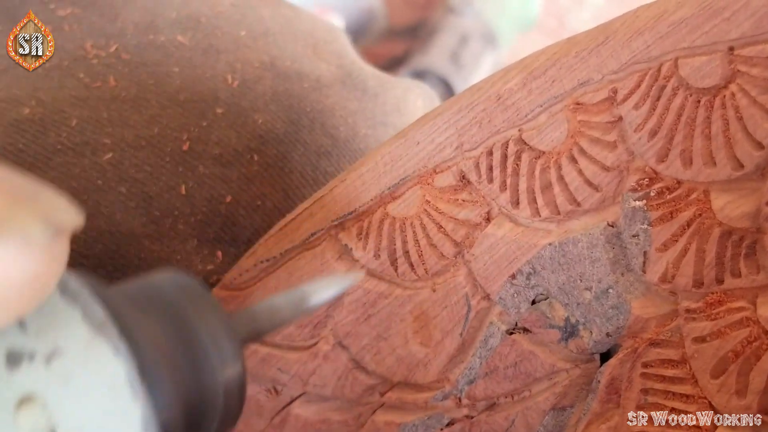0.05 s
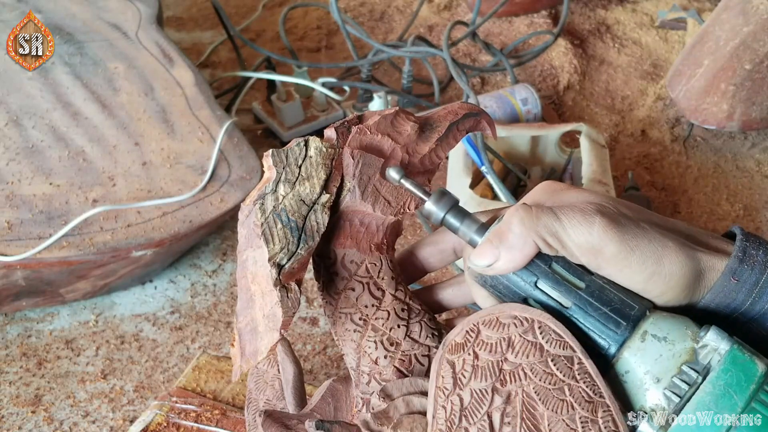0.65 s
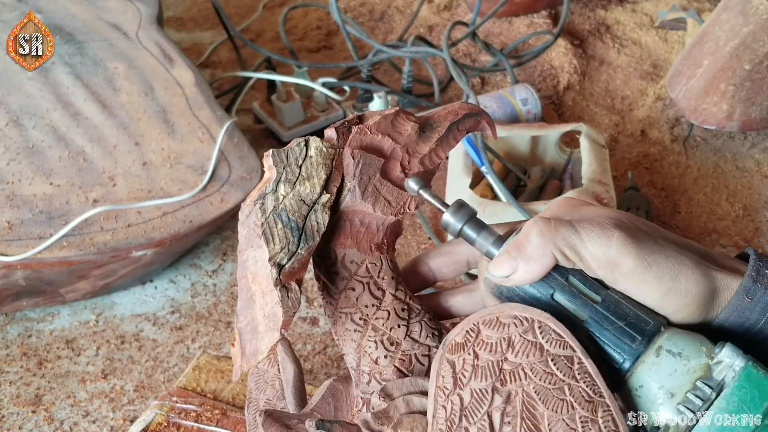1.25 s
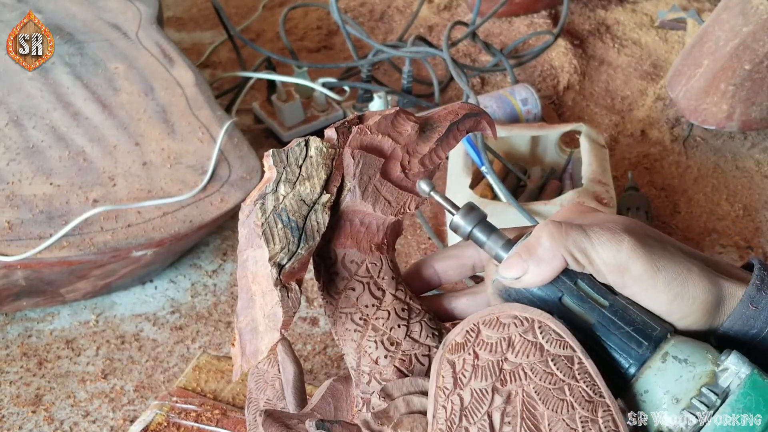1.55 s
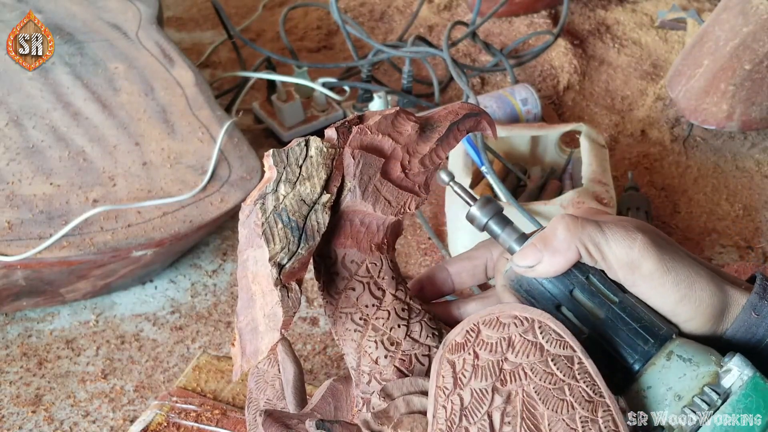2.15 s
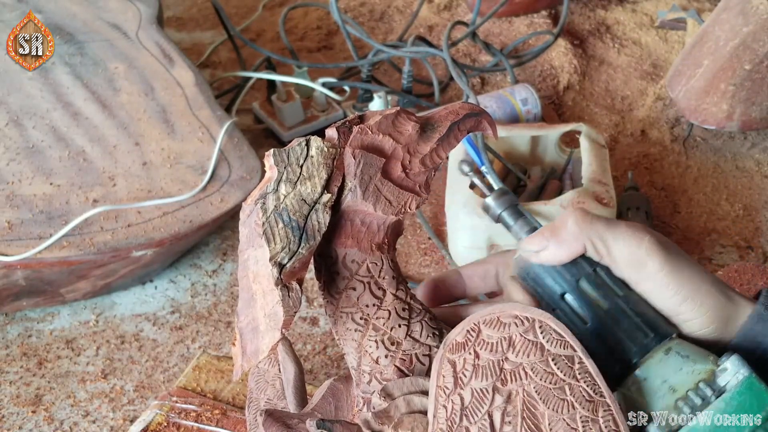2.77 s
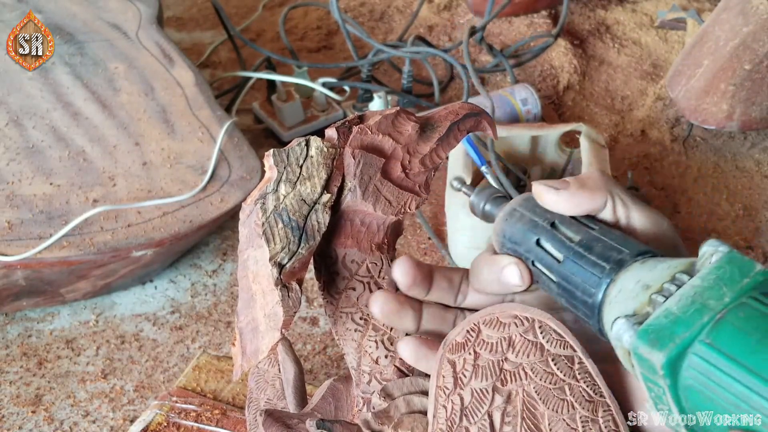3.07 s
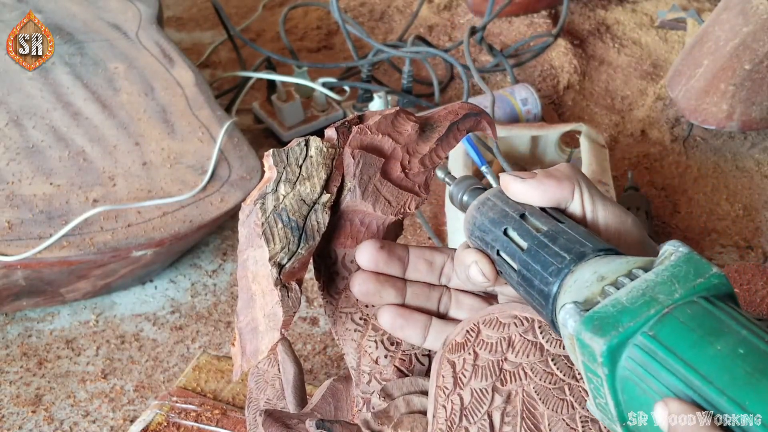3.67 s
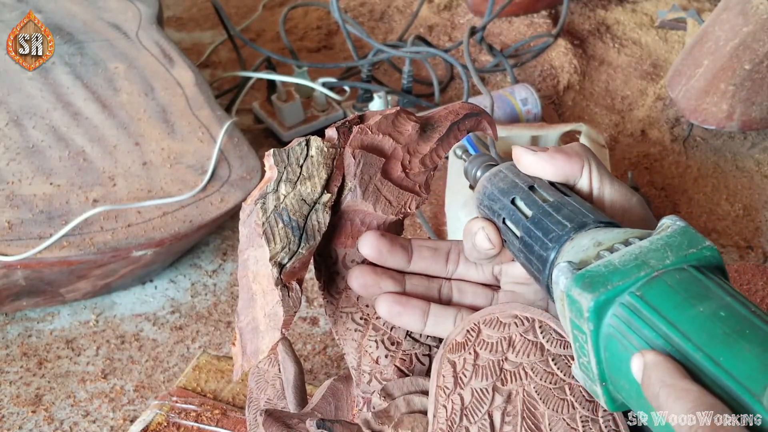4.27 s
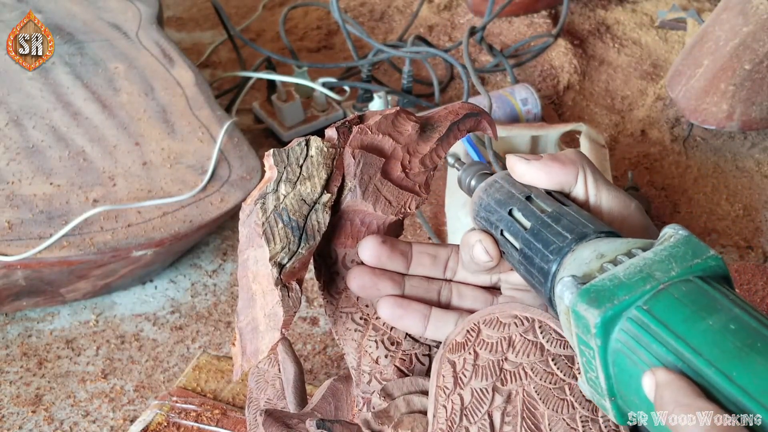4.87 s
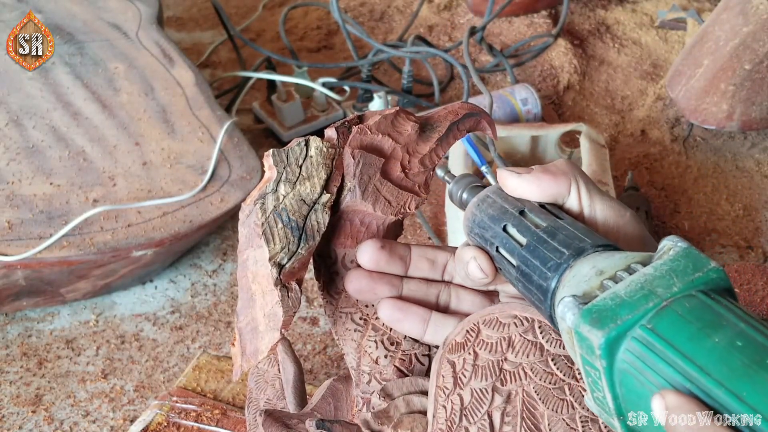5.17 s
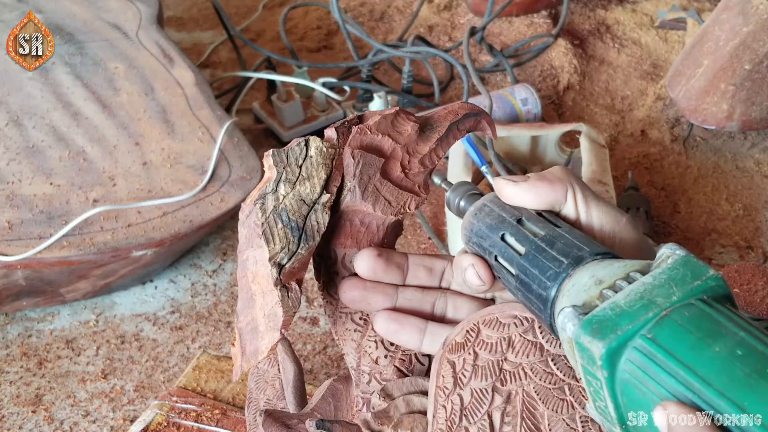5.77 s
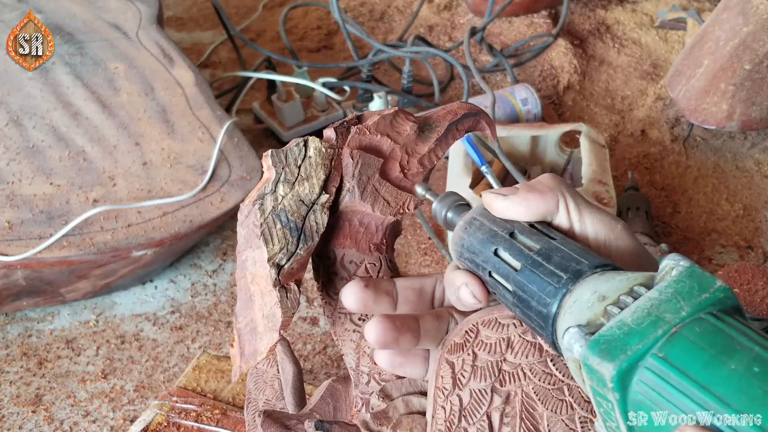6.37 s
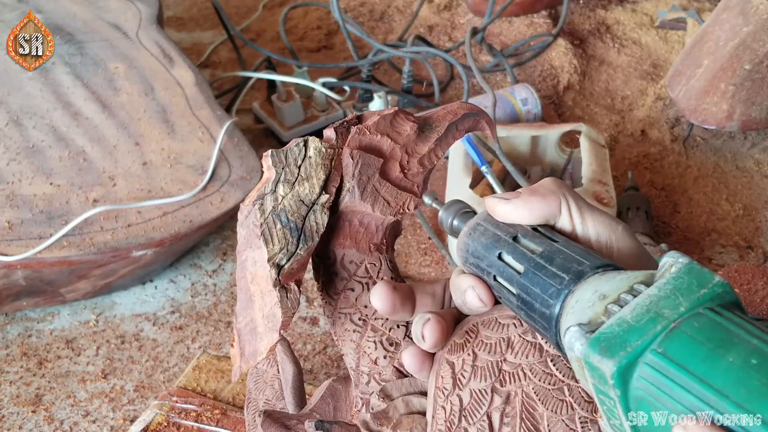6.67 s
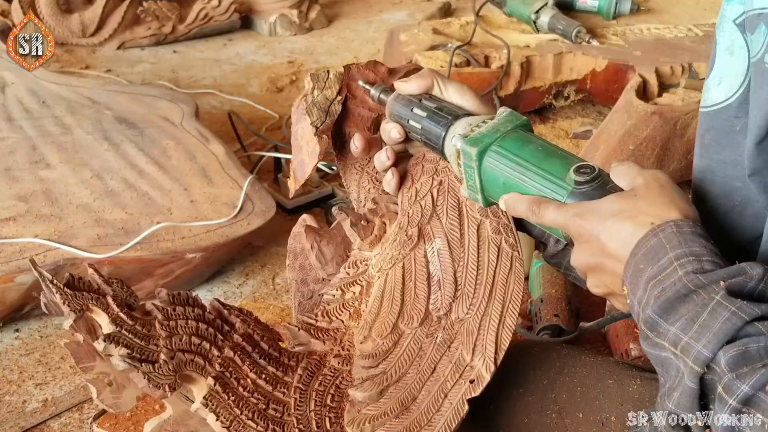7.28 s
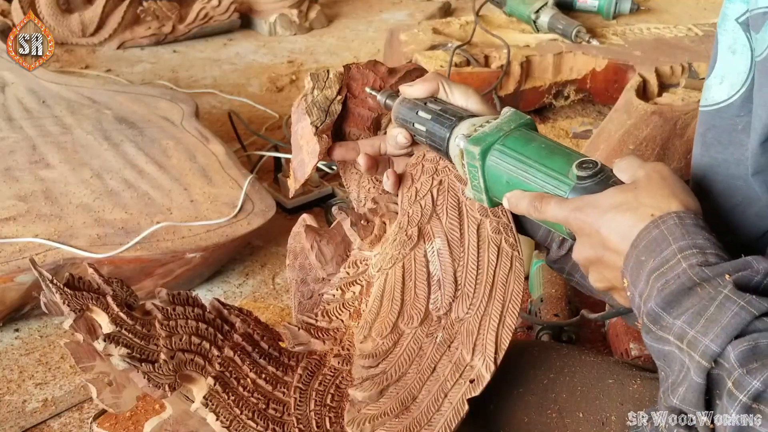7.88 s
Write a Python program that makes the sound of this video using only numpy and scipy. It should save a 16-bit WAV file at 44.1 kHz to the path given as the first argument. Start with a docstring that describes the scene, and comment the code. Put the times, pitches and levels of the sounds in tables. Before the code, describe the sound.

After a moment of close, hissy grinding, a handheld grinder is heard from a little further back, slightly to the right, in a dry-sounding workshop. Its motor hums and whines with a gently wavering pitch as the bit rasps, rings and snags on hardwood. From the middle on, the bit chatters and sings in short tones. A heavier cut slows the motor before a sudden change to slightly duller, quick scrapes.

```python
"""A die grinder carves hardwood in a small workshop, with the microphone at three distances in turn:
right beside the tool, at arm's length, then further off. The unbalanced shaft hums, the commutator
whines twelve times a turn and the fan blows through the housing. The burr scrapes the wood once a turn,
rings, chatters and at times sings on a multiple of the shaft speed, often the seventh, while the load
drags the speed down. Bench and walls spread the sound between left and right."""
import sys
import numpy as np
from scipy import signal
from scipy.fft import rfft, irfft
from scipy.io import wavfile
from scipy.ndimage import uniform_filter1d, map_coordinates

SR = 44100
rng = np.random.default_rng(int(sys.argv[2]) if len(sys.argv) > 2 else 0)


def dump(signal):
    """Clip the signal to [-1, 1] and save it as 16-bit WAV at the path in sys.argv[1]."""
    limited = np.clip(np.atleast_2d(signal).T, -1, 1)
    pcm = np.round(limited * 32767).astype(np.int16)
    wavfile.write(sys.argv[1], SR, pcm)


N = 358533
TIME = np.arange(N) / SR

# microphone close by, at arm's length, further off: (start [s], end [s], fade-in [s])
MIC_POSITIONS = [(0, .342, 0.001), (0.356, 7.322, 0.02), (7.36, 8.2, 0.025)]
# speed of the shaft: (time [s], speed [turns/s])
SHAFT_SPEED = [(0.34, 407.3), (0.38, 410.5), (0.5, 411), (0.7, 421), (0.95, 423), (1.2, 415.5),
               (1.35, 426.5), (2.78, 448), (3.5, 454.5), (3.74, 448.5), (4.3, 441), (5.05, 447),
               (5.5, 437.5), (5.74, 443), (6.15, 434.5), (6.42, 426), (6.58, 430.5), (6.73, 422.5),
               (7.18, 388.7), (7.33, 382.3), (7.35, 423), (7.57, 423), (7.62, 426), (7.77, 426),
               (7.86, 422), (8.12, 427.5)]
# grinding rush right beside the tool: (frequency [Hz], relative level [dB])
CLOSE_SPECTRUM = [(50, -64), (170, -17.5), (330, -9.5), (700, -1), (1600, -6), (2200, 2.5), (2900, 0),
                  (5000, -0.5), (7300, -11.5), (9200, -12), (10100, -1.5), (11100, -6.5), (11900, -0.5),
                  (13200, -14), (15500, -9.5)]
# steady whistles close to the housing: (frequency [Hz], level [dB])
HOUSING_WHISTLES = [(2224, -58), (2439, -55), (3381, -57), (6681, -57), (11859, -61), (12640, -52),
                    (13361, -65)]
# low room tone: (frequency [Hz], relative level [dB])
ROOM_SPECTRUM = [(25, -7), (60, 1.5), (170, 2), (300, -1), (1000, -44), (15000, -64)]
# strength of the fan's air: (time [s], level [dB])
FAN_LEVEL = [(.55, -52.5), (1.05, -49), (1.27, -51), (1.5, -49.5), (2.1, -50.5), (2.6, -46), (3.45, -43.5),
             (3.9, -47), (4.7, -44.5), (5.3, -44), (5.55, -47.5), (6.45, -51), (6.9, -48.5), (7.32, -52),
             (7.36, -43.5), (7.85, -47.5), (8.12, -47)]
# colour of the fan's air: (frequency [Hz], relative level [dB])
FAN_SPECTRUM = [(140, -37), (265, -9.5), (350, -13.5), (620, -5), (1050, -3), (1350, -1.5), (1550, -2),
                (1760, -1), (1980, -5), (2230, -3), (2700, -4), (3400, 0), (4900, 3), (6000, -3),
                (6900, -3.5), (8200, -13), (9300, -11), (11200, -7), (15500, -16.5)]
# strokes of the burr: (start [s], length [s], wood scrape [dB], bit ring [dB], buzz [dB])
BURR_STROKES = [(0.344, 0.2, -53.5, -49, -76), (0.628, 0.045, -68, -53, -73), (.68, 0.096, -55.5, -54, -73),
                (0.784, 0.14, -58.5, -49.5, -69), (0.892, 0.17, -55.5, -48, -59),
                (1.068, 0.11, -51.5, -48.5, -58), (1.383, 0.031, -49, -47.5, -66),
                (1.448, 0.13, -58.5, -51, -62), (1.628, 0.087, -55, -49, -68),
                (1.755, 0.079, -57.5, -50.5, -67), (1.967, 0.051, -53, -53, -56),
                (2.555, 0.045, -71, -68, -52.5), (2.734, 0.044, -52, -51, -51.5),
                (3.074, 0.021, -49, -65, -52), (3.48, 0.034, -48.5, -53, -56),
                (3.546, 0.3, -58.5, -60, -62), (3.903, 0.036, -50.5, -51, -54),
                (3.946, 0.31, -58, -53.5, -61.5), (4.283, 0.11, -53, -55, -53),
                (4.384, 0.33, -69, -54.5, -60.5), (4.884, 0.11, -72, -55, -57),
                (5.068, 0.22, -50.5, -61, -70), (5.26, 0.076, -45, -43.5, -59),
                (5.492, 0.12, -63, -56, -72), (5.698, 0.1, -57, -54, -73),
                (5.83, 0.061, -47.5, -44.5, -52.5), (5.89, 0.32, -57, -57, -76),
                (5.998, 0.034, -44.5, -56, -54), (6.159, 0.077, -46.5, -45.5, -54),
                (6.274, 0.11, -53.5, -52, -58), (6.399, 0.025, -54, -48, -53),
                (6.497, 0.072, -71, -51.5, -79), (6.58, 0.32, -49.5, -55.5, -58),
                (6.863, 0.29, -46, -47, -59), (7.133, 0.18, -46.5, -70, -59), (7.37, .03, -55, -54, -62),
                (7.415, 0.043, -46, -45, -54), (7.45, 0.034, -51, -43.5, -60),
                (7.522, 0.029, -47, -51, -53), (7.551, .018, -43.5, -46, -56),
                (7.621, 0.013, -45.5, -46, -52), (7.66, 0.048, -51.5, -50, -55),
                (7.741, 0.05, -50, -49, -59), (7.8, 0.05, -45, -50, -57), (7.889, 0.025, -55, -51, -51),
                (7.961, 0.012, -57, -44, -52), (8.029, 0.016, -49, -46, -50.5), (8.1, 0.014, -54, -51, -56)]
# between strokes the burr only skims the wood: (wood scrape [dB], bit ring [dB], buzz [dB])
BURR_SKIM = (-71, -62, -69)
# tearing fibres: (frequency [Hz], relative level [dB])
SCRAPE_SPECTRUM = [(130, -55), (300, -8), (650, -14), (1050, -12), (1450, -4), (2000, 4.5), (2500, -3),
                   (3050, 5), (3650, -7), (4600, 1.5), (5600, -16), (8000, -16.5), (15500, -27)]
# resonances of the wooden piece: (frequency [Hz], width [Hz], gain [dB])
WOOD_MODES = [(924, 180, -20), (1285, 24, -1), (1746, 100, 1), (2206, 250, -4.5), (2565, 57, -9)]
# resonances of the bit in its collet: (frequency [Hz], width [Hz], gain [dB])
BIT_MODES = [(3130, 57, 2), (3203, 24, 9), (3330, 130, -8.5)]
# the bouncing burr sings: (start [s], length [s], multiple [cycles/turn], level [dB])
BURR_SONGS = [(0.725, 0.3, 3, -61.5), (1.077, 0.083, 3, -52), (1.41, 0.17, 3, -59),
              (3.458, 0.029, 7, -42.5), (3.495, 0.16, 3, -59), (3.505, 0.083, 7, -39),
              (3.587, 0.074, 7, -43.5), (3.677, 0.095, 7, -49), (3.87, 0.4, 7, -49.5), (4.33, 0.2, 5, -56),
              (4.475, 0.29, 6, -58), (4.68, 0.14, 7, -53), (4.646, 0.14, 3, -54), (4.93, 0.15, 5, -51.5),
              (4.95, 0.17, 7, -51), (5.068, 0.13, 7, -47), (5.217, .15, 7, -44.5), (5.057, 0.48, 3, -69),
              (5.72, 0.32, 3, -59.5), (5.704, 0.22, 7, -50), (5.93, 0.5, 7, -55), (6.573, 0.1, 7, -51.5),
              (6.634, 0.3, 3, -56.5), (6.57, 0.31, 2, -63), (6.62, 0.31, 4, -49.5), (6.605, 0.59, 5, -52),
              (7.515, 0.059, 2, -54.5), (7.777, 0.08, 2, -63)]
# the whine beams past the microphone as the hand turns: (time [s], level [dB], left minus right [dB])
WHINE_BEAM = [(.4, -57, -14), (.85, -50, -5.5), (1.2, -47, -2.5), (1.8, -48, -2), (2.3, -46, -4),
              (2.65, -41, -2.5), (2.95, -45, 6), (3.08, -43.5, -11), (3.3, -42.5, -1), (3.7, -41.5, -1),
              (3.95, -45.5, -3), (4.4, -55, 6), (4.75, -49.5, 9), (5.0, -48, -6), (5.8, -49, -5),
              (6.0, -52.5, 2), (6.14, -46.5, -3), (6.25, -51, -3), (6.45, -52, 0), (6.72, -52, 3),
              (6.9, -49, 2), (7.32, -52, -2), (7.36, -43, -4), (7.75, -42.5, -2), (7.98, -52, 5),
              (8.12, -43, 1)]
# the whine swirls, reaching the two sides in opposite phase: (start [s], length [s])
WHINE_SWIRLS = [(.65, .22), (1.06, .08), (1.22, .05), (1.48, .03), (1.57, .09), (1.79, .09), (1.97, .04),
                (2.09, .12), (2.52, .07), (2.72, .09), (3.15, .1), (3.35, .04), (3.78, .05), (5.26, .4),
                (5.89, .1), (6.18, .2), (6.58, .2), (7.06, .2), (7.49, .03), (7.77, .035)]
# hum of the shaft: (time [s], level [dB], roughness [0-1])
SHAFT_HUM = [(0.38, -54, 0.3), (0.45, -54, 0.13), (0.69, -62.5, 0.33), (1.1, -58, 0.43),
             (1.25, -58.5, 0.26), (2.54, -54, 0.13), (2.58, -51.5, 0.11), (3.39, -49.5, 0.05),
             (3.72, -44, 0), (3.9, -51, 0.1), (4.5, -51.5, 0), (5.05, -46.5, 0.05), (5.1, -44.5, 0.17),
             (5.29, -44.5, 0), (5.6, -52, 0.06), (6.16, -47.5, 0.11), (6.51, -54.5, 0.04), (6.6, -49.5, 0),
             (6.72, -53, 0.13), (6.98, -50, 0), (7.13, -59.5, 0.3), (7.32, -55, 0.05), (7.36, -62.5, 0.43),
             (8.12, -56, 0.4)]
# the hum jumps in phase with a brief dip, as at a splice: (time [s], jump [cycles])
HUM_PHASE_JUMPS = [(.72, -.4), (1.07, .3), (1.41, .35), (1.62, -.35), (1.775, .35), (1.99, .45),
                   (2.97, -.15), (3.425, -.35), (4.1, .35), (4.35, -.42), (4.885, -.25), (5.062, .42),
                   (5.128, -.38), (5.718, -.3), (6.4, .25), (6.703, .43)]
# the burr catches on an edge: (time [s], peak level [dB])
EDGE_CATCHES = [(0.372, -35), (0.388, -33), (0.485, -31.5), (1.0639, -31), (1.38, -37), (1.6762, -28),
                (1.987, -34.5), (2.004, -31), (5.1391, -27), (5.26, -38), (5.993, -32.5), (6.4078, -38),
                (7.063, -43), (7.535, -37), (7.8274, -28)]
# the bit whirls in the cut: (start [s], length [s], depth [0-1])
BIT_WHIRLS = [(5.13, 0.24, .19), (5.8, .45, .1), (6.6, 0.17, 0.16), (6.8, .33, .16)]


def undb(db):
    """Decibels to gain."""
    return 10 ** (np.asarray(db) / 20)


def curves(table):
    """Each column of a table, joined by straight lines in time."""
    times, *columns = np.transpose(table)
    return [np.interp(TIME, times, column) for column in columns]


def unit(x):
    """Scale to rms 1."""
    return x / np.sqrt(np.mean(x ** 2))


def walk(rate_hz):
    """Smooth random wander of rms 1, mostly slower than rate_hz."""
    freqs = np.arange(N // 2 + 1) * SR / N
    return unit(irfft(rfft(rng.standard_normal(N)) / (1 + (freqs / rate_hz) ** 4), N))


def colour(x, spectrum):
    """Shape x by (Hz, dB) points; rms 1."""
    hz, db = np.transpose(spectrum)
    freqs = np.maximum(np.arange(N // 2 + 1) * SR / N, 1)
    return unit(irfft(rfft(x) * undb(np.interp(np.log(freqs), np.log(hz), db)), N))


def resonate(x, modes):
    """Ring a set of (Hz, width, dB) resonances."""
    return sum(undb(db) * signal.lfilter(*signal.iirpeak(hz, hz / width, fs=SR), x)
               for hz, width, db in modes)


def bend(x, ratio):
    """Move the resonances in x by a changing ratio."""
    return map_coordinates(x, [np.cumsum(ratio)], order=1, mode="mirror")


def tone(clock, rate, rough):
    """A sine of rate cycles per unit of clock (turns or seconds), shaken in size and phase."""
    size = np.sqrt(2) * (1 + rough * walk(22))
    return size * np.sin(2 * np.pi * rate * clock + rough * walk(45))


def press(start, length, attack_s, release_s):
    """Attack, hold and release, 0-1."""
    age = TIME - start
    return np.clip(age / attack_s + .5, 0, 1) * np.exp(-np.maximum(age - length, 0) / release_s)


def swell(start, length):
    """A rounded rise and fall, 0-1, at half height where it starts and ends."""
    return 1 / (1 + np.abs(2 * (TIME - start) / length - 1) ** 6)


def pan(left_minus_right_db):
    """Gains of the left and right side."""
    return undb(np.array([[left_minus_right_db], [-left_minus_right_db]]) / 2)


def fader(start, end, fade_s):
    """Gain of one microphone position: it fades in and stops short."""
    return np.clip((TIME - start) / fade_s, 0, 1) * np.exp(-np.maximum(TIME - end, 0) / .0018)


def shaft_speed(force, sag=.0016, wobble=.0007):
    """Turns per second; each stroke of the burr brakes the shaft a little."""
    speed_hz, = curves(SHAFT_SPEED)
    stroke = unit(uniform_filter1d(force, size=SR // 25) - uniform_filter1d(force, size=SR // 4))
    return speed_hz * (1 - sag * stroke + wobble * walk(17))


def rasp(turns, scatter_db, sharp, patchy_db):
    """Noise pulsing once a turn, as when fibres tear; every turn has its own strength."""
    depth = undb(scatter_db * rng.standard_normal(N // 64))[turns.astype(int)]
    pulse = np.exp(-sharp * np.cos(2 * np.pi * turns))
    return unit(rng.standard_normal(N) * depth * pulse * undb(patchy_db * walk(21.6)))


def close_grinding(turns, cut_hz=2750, cut_width_hz=450):
    """Microphone beside the tool: a bright rush, the wandering ring of the cut, hum, thin whistles."""
    rush = undb(-36) * colour(rasp(turns, scatter_db=.4, sharp=.057, patchy_db=.5), CLOSE_SPECTRUM)
    cut = resonate(rasp(turns, scatter_db=1.5, sharp=.6, patchy_db=.5), [(cut_hz, cut_width_hz, 0)])
    ring = undb(-42) * bend(unit(cut), 1 + .08 * walk(10))
    hum = undb(-51) * tone(turns, 1, rough=.048) + undb(-56) * tone(turns, 2, rough=.2)
    whistles = sum(undb(db) * tone(TIME, hz, rough=.55) for hz, db in HOUSING_WHISTLES)
    return rush + ring + hum + whistles


def background_tone(level_db, hz=556, waver_db=2.5):
    """A faint tone wavers in the background."""
    return undb(level_db + waver_db * walk(5.7)) * tone(TIME, hz, rough=.45)


def workshop(x, bass_hz=260, pan_db=-2.5, t60_s=.17, delay_s=.0035):
    """The tool is right of the microphone; bench and wall echoes make the sides differ above the bass."""
    age = TIME[:SR // 3]
    echoes = rng.standard_normal(len(age)) * np.exp(-np.log(1000) * age / t60_s)
    response = rfft(echoes, 2 * N)
    scatter = irfft(rfft(x, 2 * N) * response / np.abs(response))  # scatters phase, keeps colour
    scatter = np.roll(scatter, int(delay_s * SR))[:N]
    side = signal.sosfilt(signal.butter(2, bass_hz, "high", fs=SR, output="sos"), scatter)
    return np.array([x + side, x - side]) * pan(pan_db)


def room_tone(level_db, swell_db=3.5):
    """Faint low room noise, unrelated on the two sides."""
    level = undb(level_db + swell_db * walk(7.5))
    return level * np.array([colour(rng.standard_normal(N), ROOM_SPECTRUM) for _ in range(2)])


def fan(turns):
    """Cooling air hisses through the hollow housing."""
    air_db, = curves(FAN_LEVEL)
    return undb(air_db) * colour(rasp(turns, scatter_db=.5, sharp=.037, patchy_db=.96), FAN_SPECTRUM)


def burr_contact():
    """Gains of scrape, ring and buzz as the burr bites and lets go; the firmest stroke rules."""
    gains = undb(BURR_SKIM)[:, None] * np.ones(N)
    for start, length, *db in BURR_STROKES:
        stroke = press(start, length, attack_s=.01, release_s=.015)
        gains = np.maximum(gains, undb(db)[:, None] * stroke)
    return gains


def chips(per_s=140, spread_db=1.0):
    """Single chips snap off at random: clicks of uneven size, rms 1."""
    clicks = (rng.random(N) < per_s / SR) * rng.choice([-1, 1], N)
    return unit(clicks * undb(spread_db * np.minimum(rng.exponential(size=N), 3)))


def burr(turns, speed_hz, scrape, ring, nominal_hz=432):
    """Torn fibres and chips ring the wood and the steel bit; both drift, and the wood follows the speed."""
    fibres = unit(rasp(turns, scatter_db=-1.5, sharp=.59, patchy_db=1.5) + undb(-4) * chips())
    wood_tuning = 1 + .6 * (speed_hz / nominal_hz - 1) + .012 * walk(12.33)
    wood = bend(unit(resonate(fibres, WOOD_MODES)), wood_tuning)
    steel = bend(unit(resonate(fibres, BIT_MODES)), 1 + .009 * walk(10))
    return scrape * (colour(fibres, SCRAPE_SPECTRUM) + undb(-4) * wood) + ring * steel


def chatter(turns, speed_hz, patchy_db=2):
    """The burr bounces in step with the shaft; each multiple swells as it crosses a wood resonance."""
    buzz = 0
    for multiple in (2, 4, 5, 6):
        response = sum(undb(db) / (1 + 2j * (multiple * speed_hz - hz) / width)
                       for hz, width, db in WOOD_MODES)
        buzz += abs(response) * undb(patchy_db * walk(4.8)) * tone(turns, multiple, rough=.65)
    return buzz


def whirl(turns, speed_hz, skip_depth=.8, orbits_per_turn=.15):
    """Gain from the bit's unsteady orbit and uneven bite: it adds sidebands and half multiples."""
    depth = sum(size * swell(start, length) for start, length, size in BIT_WHIRLS) * (1 + .5 * walk(23))
    orbit = depth * np.cos(2 * np.pi * orbits_per_turn * turns + 1.1 * walk(8.9))
    labour = np.clip((421 - speed_hz) / 40.3, 0, 1)  # slowed, the burr bites harder every other turn
    return 1 + orbit + skip_depth * labour * np.cos(np.pi * turns)


def commutator_whine(turns, speed_hz, force, bars=12, flutter_db=1.9, dropout_db=-9, duck_db=-1):
    """The commutator bars whine; the moving hand makes each side shimmer and now and then dip."""
    level_db, pan_db = curves(WHINE_BEAM)
    air_db, = curves(FAN_LEVEL)
    # the octave shows only near full speed and leaves through the vents with the air
    octave = np.clip((speed_hz - 410) / 25, 0, 1) * undb(air_db - 18.5 + 2 * walk(5))
    load = np.minimum(force / undb(-50), 2) / 2
    swirl = sum(press(start, length, attack_s=.016, release_s=.008) for start, length in WHINE_SWIRLS)
    apart_rad = .7 * walk(3.8) + 3 * swirl
    sides = []
    for side in (1, -1):
        arrival = turns + side * apart_rad / (4 * np.pi * bars)
        whine = undb(level_db) * tone(arrival, bars, rough=.16)
        whine += octave * tone(turns, 2 * bars, rough=.45)
        shimmer_db = flutter_db * walk(34) + dropout_db * np.maximum(walk(16) - 1, 0)
        sides.append(whine * undb(side * pan_db / 2 + shimmer_db + duck_db * load))
    return np.array(sides)


def shaft_hum(turns, speed_hz, jump_s=.004, dip_db=-4, room_hz=387.6, room_width_hz=5.8):
    """Unbalance hums once a turn and beats with a faint lower tone."""
    level_db, rough = curves(SHAFT_HUM)
    # now and then the phase jumps and the level dips briefly
    shift = sum(size * (1 + np.tanh((TIME - at) / jump_s)) / 2 for at, size in HUM_PHASE_JUMPS)
    dip = sum(np.exp(-((TIME - at) / (2 * jump_s)) ** 2) for at, _ in HUM_PHASE_JUMPS)
    level = undb(level_db + .6 * walk(6.9) + dip_db * dip)
    beating = tone(turns + shift, 1, rough) + undb(-22) * tone(turns, .895, rough=.28)
    hum = level * beating * whirl(turns, speed_hz, skip_depth=.17)
    overtones = undb(-18) * tone(turns, 2, rough=.28) + undb(-11.5) * tone(turns, 3, rough=.28)
    # at low speed the hum meets a standing wave of the room, opposite on the two sides
    standing = hum * undb(10.5) * np.exp(-((speed_hz - room_hz) / room_width_hz) ** 2)
    return hum * pan(-5) + np.array([-standing, standing]) + workshop(level * overtones)


def catches(decay_s=.004, band_hz=(700, 4800), wood_mode=(2100, 1300, -5)):
    """Short cracks where the burr snags, ringing through wood and bit."""
    cracks = np.zeros(N)
    soften = signal.butter(2, band_hz, "band", fs=SR, output="sos")
    age = TIME[:SR // 20]
    for at, db in EDGE_CATCHES:
        snag = signal.sosfilt(soften, rng.standard_normal(len(age)) * np.exp(-age / decay_s))
        crack = resonate(snag, BIT_MODES + [wood_mode])
        start = int(at * SR)
        cracks[start:start + len(age)] += undb(db) * crack / np.abs(crack).max()
    return cracks


def singing(turns, speed_hz, waver_db=.8):
    """The bouncing burr sings on single multiples of the speed, rougher as the shaft labours."""
    rough = .26 + .25 * np.clip((428 - speed_hz) / 20, 0, 1)
    song = 0
    for multiple in sorted({row[2] for row in BURR_SONGS}):
        level = sum(undb(db) * swell(start, length)
                    for start, length, sung, db in BURR_SONGS if sung == multiple)
        song += level * undb(waver_db * walk(4.7)) * tone(turns, multiple, rough)
    return song


def further_off(x, dull_hz=12500, boom_hz=295, boom_width_hz=60, boom_db=-2):
    """With the microphone further back the top is duller and the room booms a little."""
    dulled = signal.sosfilt(signal.butter(1, dull_hz, fs=SR, output="sos"), x)
    return dulled + resonate(x, [(boom_hz, boom_width_hz, boom_db)])


def scene():
    """One shaft drives the tool's sounds; the three microphone positions follow each other abruptly."""
    scrape, ring, buzz = burr_contact()
    speed_hz = shaft_speed(scrape)
    turns = np.cumsum(speed_hz) / SR
    carving = fan(turns) + burr(turns, speed_hz, scrape, ring)
    bouncing = buzz * chatter(turns, speed_hz) + singing(turns, speed_hz)
    carving += bouncing * whirl(turns, speed_hz) + catches()
    arms_length = workshop(carving + background_tone(level_db=-73))
    arms_length += commutator_whine(turns, speed_hz, scrape) + shaft_hum(turns, speed_hz)
    arms_length += room_tone(level_db=-87)
    close = workshop(close_grinding(turns) + background_tone(level_db=-61), bass_hz=520, pan_db=-.5)
    close += room_tone(level_db=-76)
    far = further_off(arms_length) + room_tone(level_db=-84)
    return sum(fader(*span) * sound for span, sound in zip(MIC_POSITIONS, (close, arms_length, far)))


def record(dry, top_hz=15750):
    """The recorder cuts the top steeply."""
    return signal.sosfilt(signal.ellip(10, .2, 70, top_hz, fs=SR, output="sos"), dry)


dry = scene()
out = record(dry)
dump(out)
```